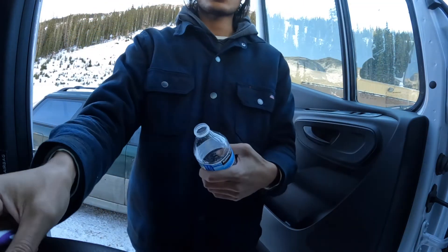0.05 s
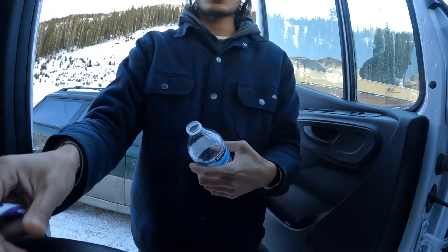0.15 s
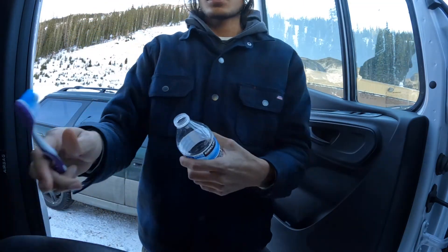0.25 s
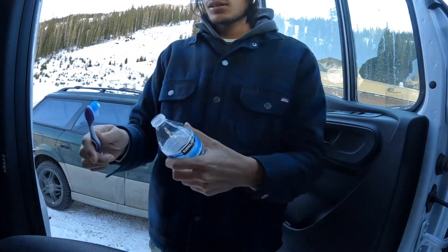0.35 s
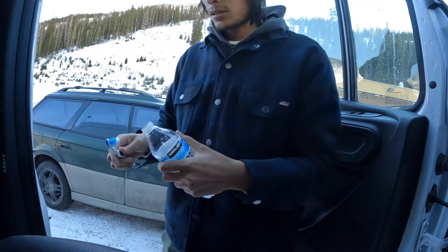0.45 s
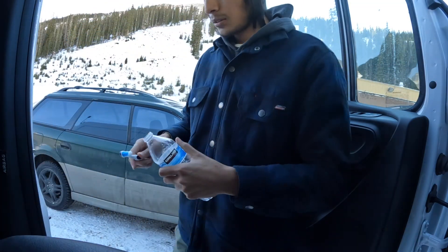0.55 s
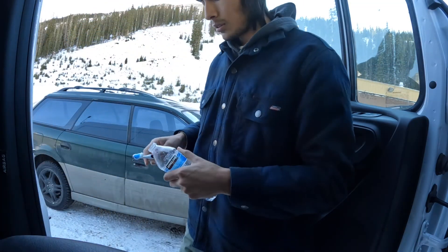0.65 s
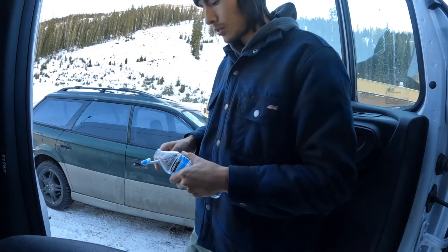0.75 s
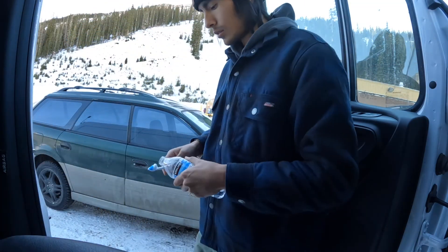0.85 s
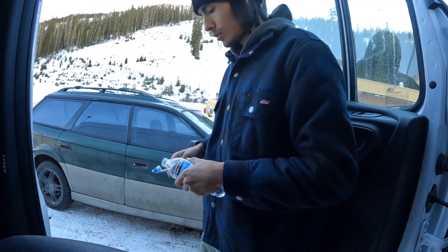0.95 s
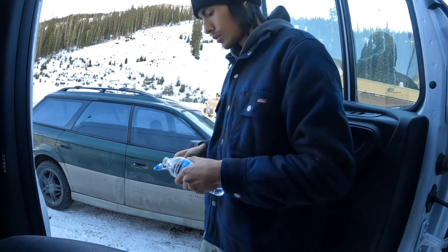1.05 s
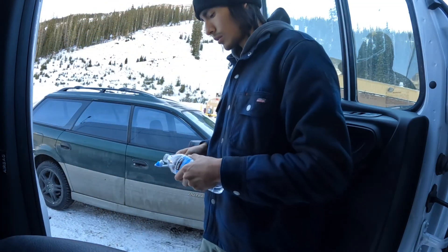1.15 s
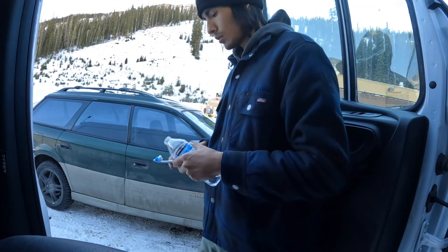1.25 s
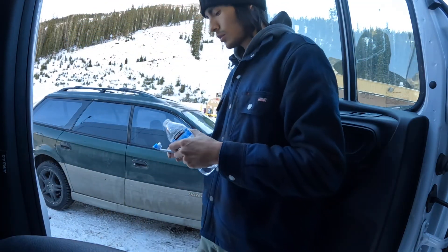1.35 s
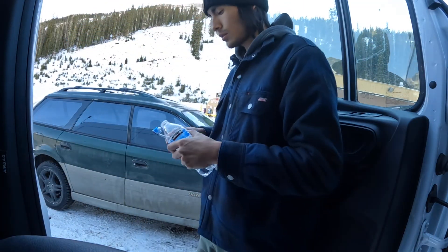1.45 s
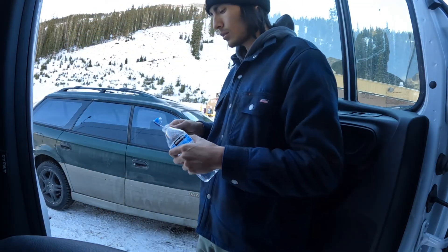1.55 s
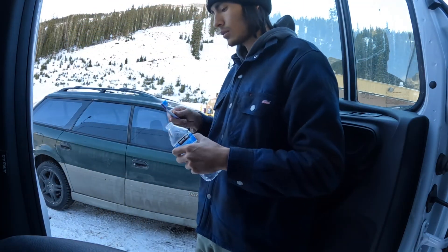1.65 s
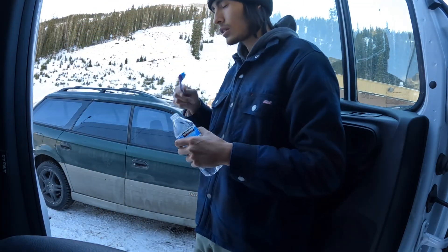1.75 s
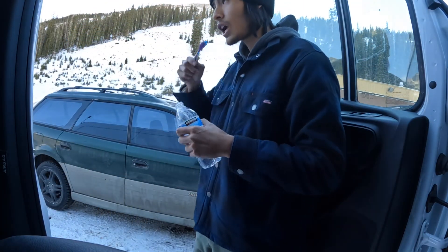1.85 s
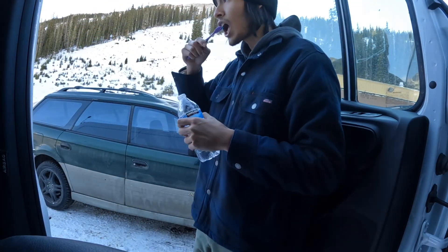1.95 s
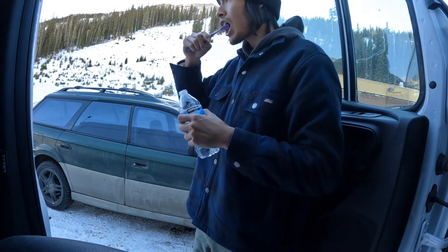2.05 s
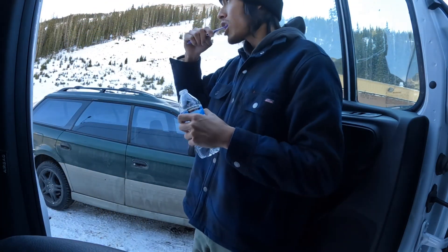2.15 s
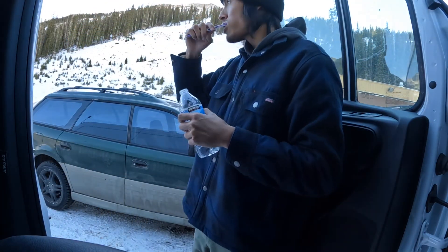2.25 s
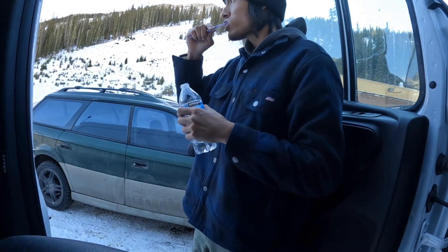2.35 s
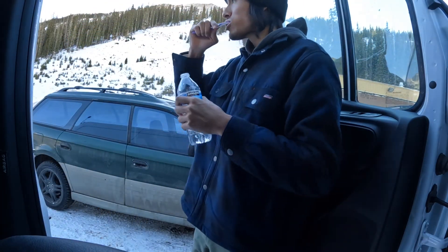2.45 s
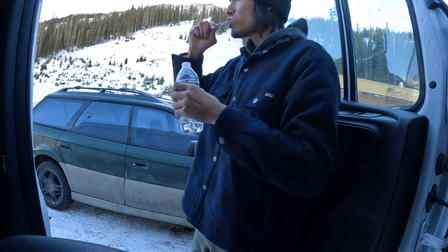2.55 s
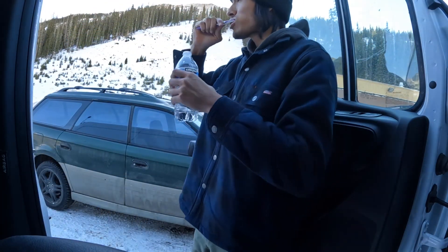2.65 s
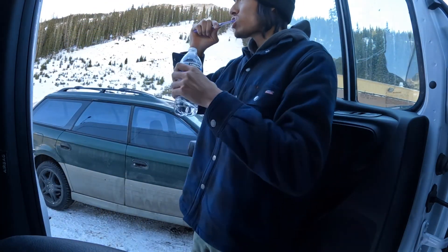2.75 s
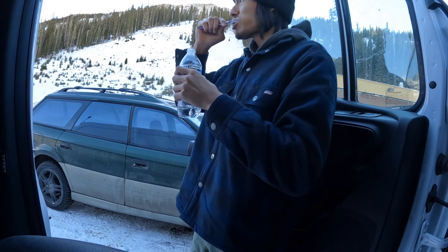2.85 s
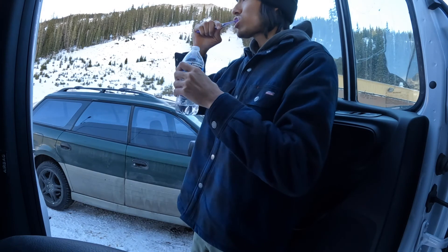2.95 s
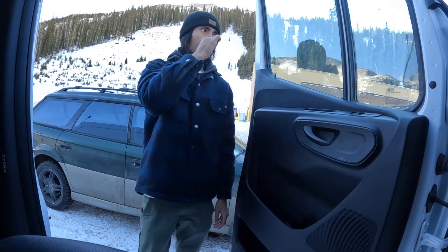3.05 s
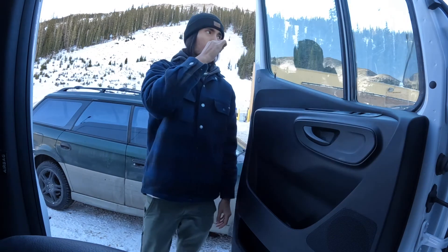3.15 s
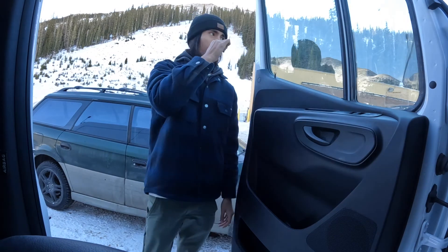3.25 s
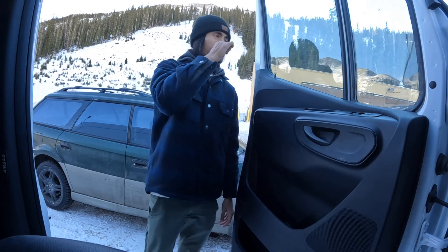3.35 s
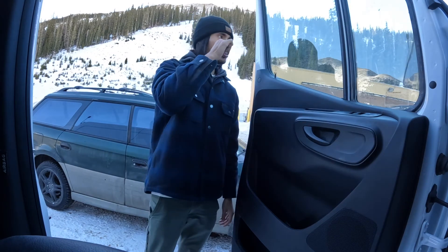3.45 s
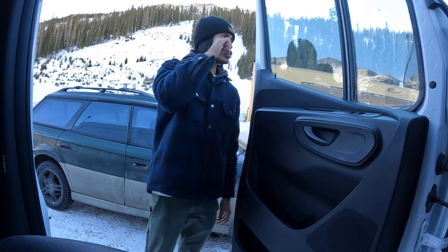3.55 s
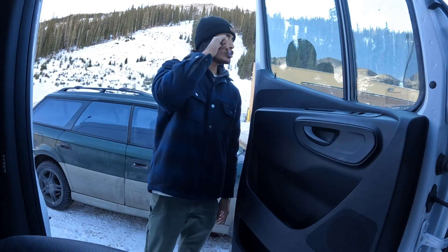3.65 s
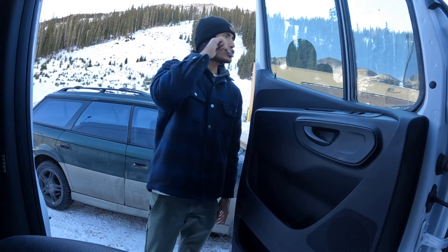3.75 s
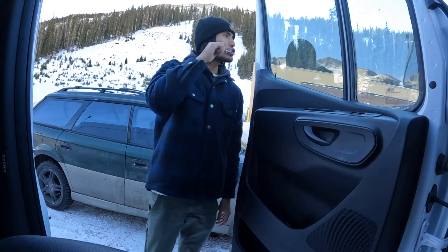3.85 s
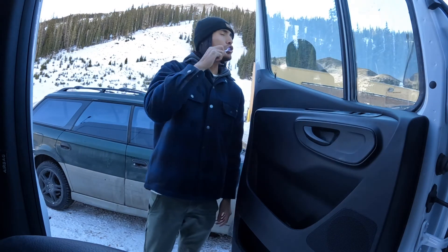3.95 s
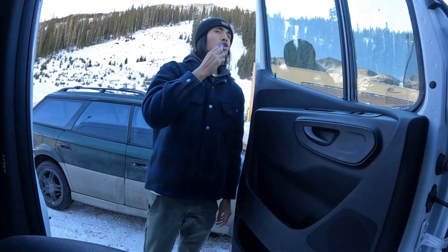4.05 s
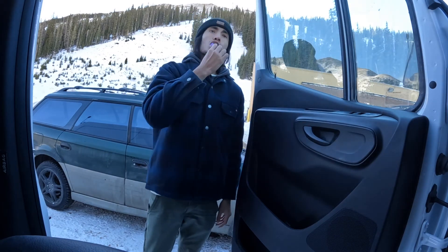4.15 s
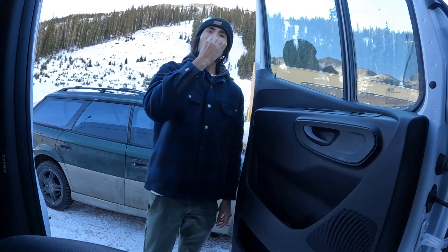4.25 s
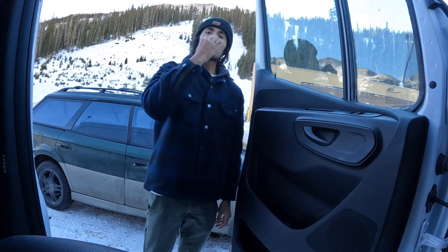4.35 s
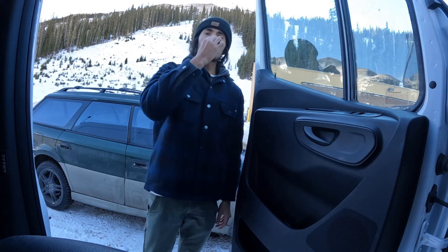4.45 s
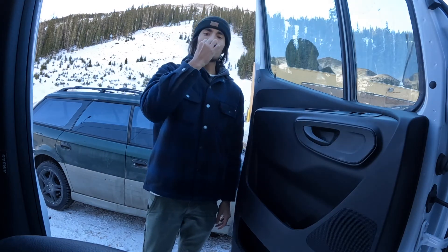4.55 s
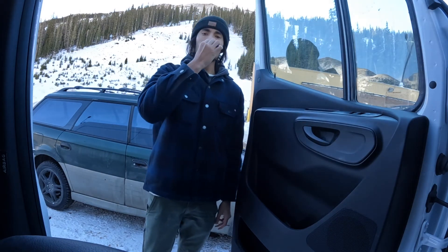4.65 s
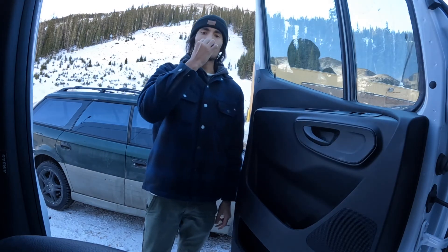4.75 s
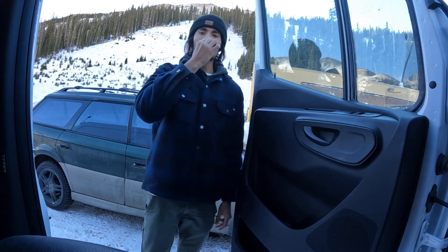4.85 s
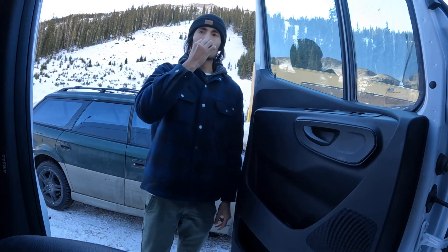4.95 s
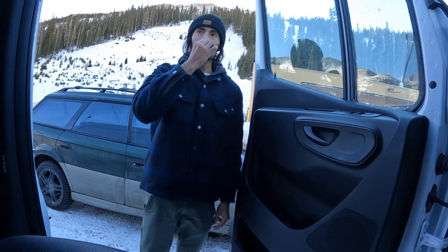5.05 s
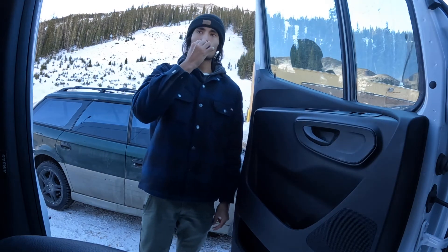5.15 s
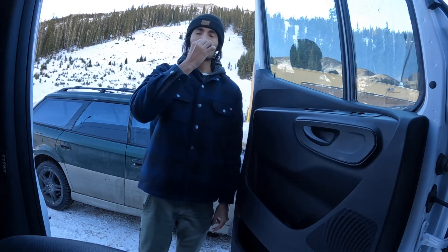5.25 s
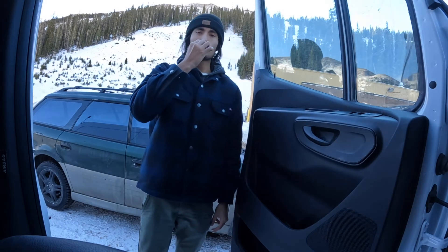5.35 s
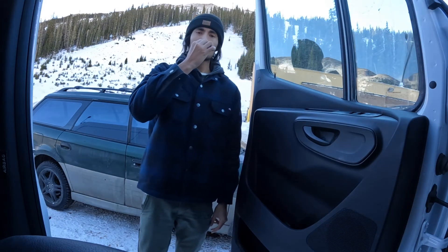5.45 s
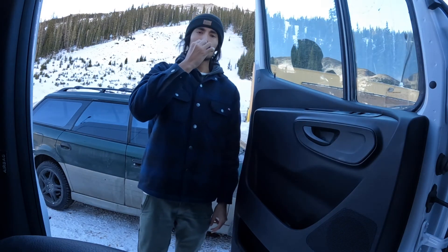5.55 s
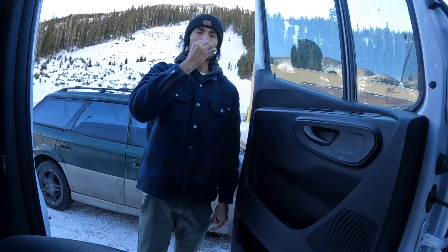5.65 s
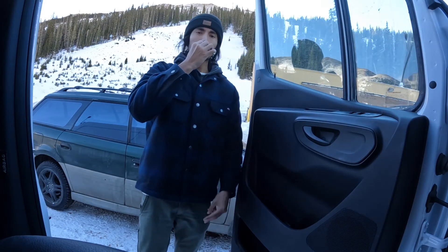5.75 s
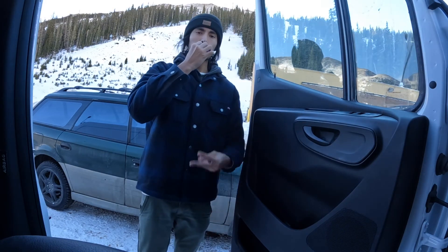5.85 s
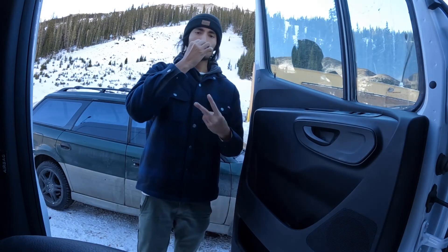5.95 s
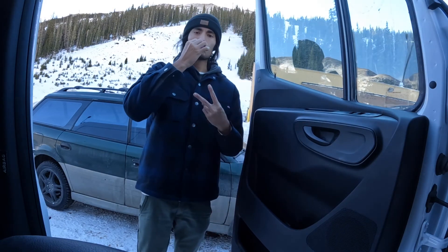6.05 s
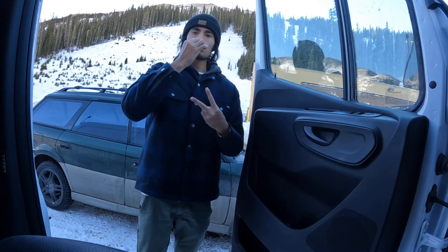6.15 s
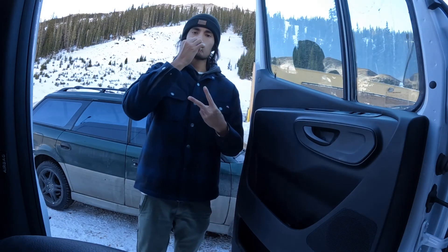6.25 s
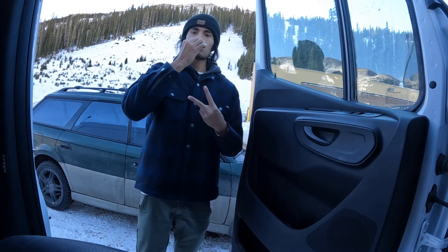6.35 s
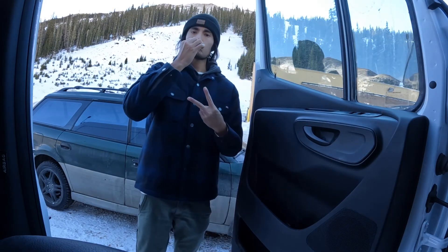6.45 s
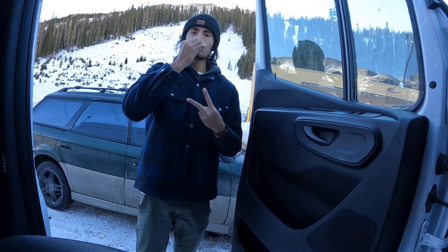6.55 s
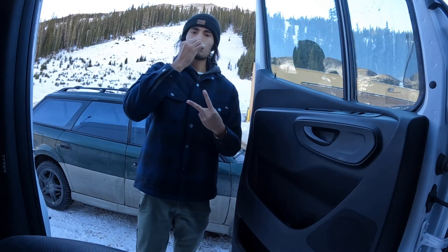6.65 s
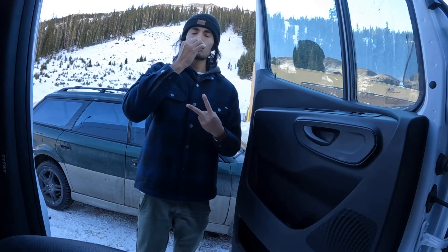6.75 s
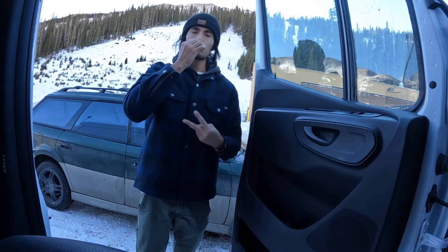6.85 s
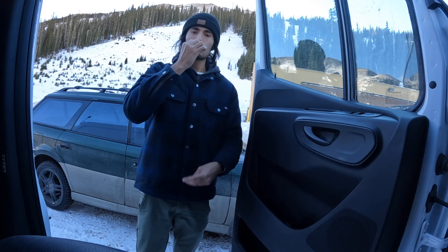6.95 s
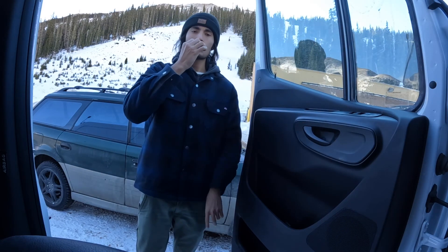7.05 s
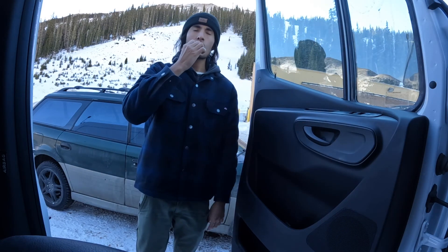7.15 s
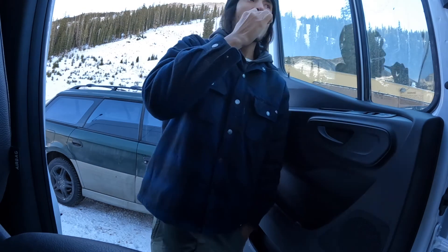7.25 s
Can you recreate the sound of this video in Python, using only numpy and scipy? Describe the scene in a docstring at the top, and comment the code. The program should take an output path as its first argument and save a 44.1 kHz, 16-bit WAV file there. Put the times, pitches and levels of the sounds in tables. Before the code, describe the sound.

Small clinks and plastic clicks, three hollow knocks on a van door with low booms, then brisk toothbrushing over a droning diesel engine.

```python
"""Small metal clinks and plastic clicks open the scene, as a man at a van's open door takes up his toothbrush.
He knocks on the hollow door three times, and the van's body booms low under the knocks and between them.
He scrubs his teeth: shaped noise makes bristle hiss and rasp, and the mouth's resonance makes foam squelch.
Behind him a diesel engine, built from sine lines, sets in and sags near the end.
Filtered noise makes the background roar and hiss; late on, tyre hiss grows and a thin whine climbs."""
import sys
import numpy as np
from scipy import signal
from scipy.fft import rfft, irfft, next_fast_len
from scipy.io import wavfile
from scipy.ndimage import uniform_filter1d, map_coordinates

SR = 44100
rng = np.random.default_rng(int(sys.argv[2]) if len(sys.argv) > 2 else 0)


def transcribe(signal):
    """Save signal, clipped to [-1, 1], as a 16-bit WAV file at the path in sys.argv[1]."""
    frames = np.atleast_2d(signal).T
    limited = np.clip(frames, -1, 1)
    pcm = np.round(limited * 32767).astype(np.int16)
    wavfile.write(sys.argv[1], SR, pcm)


N = 321930

# Levels in the tables are relative: each sound's own gains come on top.
# bouts of even to-and-fro brushing: first_push_s, last_push_s, cycle_s, hiss_db, rasp_db, foam_db
BRUSHING_BOUTS = [(3.205, 3.86, .218, -69, -70, -73), (4.047, 5.88, .2033, -69.5, -71, -59.5),
                  (6, 7.29, .213, -71.5, -72.5, -56)]
# colour of the bristle hiss: freq_hz, level_db
BRISTLE_COLOUR = [(3000, -20), (5200, -8), (6500, 0), (7300, -1.5), (9000, -8.5), (12200, -13),
                  (15000, -20)]
# colour of the rasp on the teeth: freq_hz, level_db
TEETH_COLOUR = [(1200, -4.5), (2200, 7), (3000, 3.5), (3800, -1.5), (4400, -1), (5300, -34), (8000, -40.5)]
# how openly the brush sounds between the lips: time_s, level_db
LIP_OPENING = [(2.5, -33), (2.9, -4), (3.45, -4), (4.1, -7.5), (4.65, 2.5), (5.6, -0.5), (6.03, 3),
               (6.3, 2), (6.95, 5), (7.3, 12.5)]
# resonance of the mouth cavity: time_s, pitch_hz
MOUTH_PITCH = [(3.9, 1073), (4.25, 1308), (4.7, 1261), (5.3, 1140), (5.55, 1220), (5.9, 1002), (6.45, 1031),
               (6.7, 1135), (7.3, 1271)]
# big foam bubbles that pop in the mouth: start_s, level_db
BUBBLE_POPS = [(4.244, -39), (4.656, -33), (4.868, -37.5), (5.266, -36.5), (6.229, -42), (6.433, -42.5),
               (7.28, -37)]
# small metal contacts: start_s, level_db, upper_modes_db, dry_tick_db
METAL_CONTACTS = [(0.058, -34, -24, 6.5), (0.109, -53, -14, 16), (0.1233, -27.5, -37.5, 10),
                  (0.155, -39.5, -26, 12.5), (0.465, -32, -6, -5.5), (0.4749, -15, -6.5, -6.5),
                  (0.777, -45, -5, -13), (0.832, -51, 15, 25.5), (0.838, -56, 3, 23)]
# the metal's main modes: pitch_hz, level_db, t60_s
METAL_MODES = [(2960, -12, 0.016), (5210, -7.5, 0.014), (4663, 9.5, 0.018), (5270, -21, .03)]
# the metal's upper modes: pitch_hz, level_db, t60_s
METAL_UPPER_MODES = [(7320, -1, 0.02), (8000, 3.5, 0.022)]
# the metal chatters as it slides: start_s, length_s, level_db
METAL_SLIDES = [(0.0, 0.089, -59), (.48, 0.12, -66)]
# clicks of brush and water bottle: start_s, level_db, strongest_resonance_hz, its_share_db, t60_s
PLASTIC_CLICKS = [(0.2432, -10.5, 3120, -15, 0.0052), (0.6193, -43.5, 3770, -1.5, 0.068),
                  (0.6758, -32, 2000, -1.5, 0.015), (1.0321, -43, 3330, 1, 0.033),
                  (1.2131, -54, 2020, 8, 0.05), (1.7111, -43.5, 2200, -15, 0.045),
                  (1.853, -47.5, 3380, 6, 0.035), (1.8858, -46.5, 3270, -12, 0.022),
                  (2.2468, -60, 2430, 9, 0.02), (2.2685, -51.5, 2240, -1.5, 0.025),
                  (2.4831, -45, 3670, -3, 0.013), (4.362, -44.5, 7000, -10, 0.12),
                  (6.005, -46.5, 7500, 2, 0.042), (7.222, -35, 2350, 4.5, 0.023)]
# colour of plastic clicks and dry ticks: freq_hz, level_db
PLASTIC_COLOUR = [(290, -38), (500, -2.5), (1330, -2.5), (2920, -5.5), (3270, -7.5), (3560, -3),
                  (5230, -15.5), (7360, -5.5), (8990, -23.5), (12300, -29.5), (15000, -35.5)]
# moves of the jacket: start_s, length_s, cloth_db, dull_rub_db
JACKET_MOVES = [(0.0, 0.38, -54, -45.5), (.38, 0.41, -57, -49.5), (0.628, 0.036, -38, -52),
                (0.686, 0.035, -54, -43), (0.801, 0.19, -55, -46.5), (1.015, 0.072, -54, -43),
                (1.088, 0.11, -56.5, -38), (1.872, 0.08, -58, -60), (1.954, 0.17, -62, -55.5),
                (2.117, 0.28, -76, -56.5), (2.625, .45, -64.5, -59), (3.19, 0.353, -61, -54.5)]
# colour of cloth on cloth: freq_hz, level_db
CLOTH_COLOUR = [(240, -24.5), (400, -4.5), (1100, -6.5), (1910, -20.5), (2320, -17.5), (4010, -20.5),
                (5350, -32.5), (7130, -25), (12100, -40.5), (13900, -43), (15000, -68)]
# blows on the door: start_s, panel_db, thump_db, crunch_db, rise_s
DOOR_BLOWS = [(0.711, -26, -25.5, -50, 0.0033), (0.7246, -15, -18.5, -24, 0.0011),
              (0.75, -26.5, -21, -32.5, 0.0059), (1.091, -20, -13, -24, 0.0023),
              (1.117, -25, -20.5, -34.5, 0.0046), (1.36, -24.5, -34, -35, 0.0037),
              (1.38, -26, -38, -46, 0.0026)]
# the door panel's modes: pitch_hz, level_db, t60_s
PANEL_MODES = [(390, -9, 0.13), (494, -7, 0.086), (560, -2, 0.14), (628, 7, 0.051), (715, -9, 0.037),
               (862, -9, 0.11), (949, -1, 0.057), (1130, -6, 0.096), (1237, -14, 0.072), (1420, -30, 0.08),
               (1700, -28, 0.05), (2190, -17, 0.047), (2910, -20, .06)]
# colour of the air behind the panel: freq_hz, level_db
HOLLOW_COLOUR = [(40, 9), (110, -5), (190, 3.5), (280, -0.5), (500, -13.5), (1100, -26), (3000, -65.5)]
# colour of the crunching trim: freq_hz, level_db
TRIM_COLOUR = [(400, -14), (900, 4.5), (1300, 0), (2000, -9.5), (4000, -11.5), (5200, -19), (7300, -21.5),
               (9500, -32), (12500, -37.5), (15000, -56)]
# low booms of the van's body, under the knocks and between them:
# start_s, level_db, most_excited_hz, left_minus_right_db
BODY_BOOMS = [(0.274, -20, 92, -2), (0.727, -11.5, 112, 0), (0.81, -19.5, 83, -2), (0.941, -21.5, 100, -2),
              (1.09, -3, 54.7, -0.5), (1.098, -23, 181, 0), (1.229, -16, 48, 0.5), (1.365, -19.5, 133, 1.5),
              (1.533, -16.5, 140, -8.5), (1.621, -25, 72, -5), (1.709, -23.5, 53, -6), (2.371, -22, 46, 0),
              (2.434, -19, 46, 0.5), (2.738, -27.5, 70, -0.5)]
# modes of the van's body: pitch_hz, level_db, t60_s
BODY_MODES = [(38.2, 4.5, .55), (48.5, -14, 0.39), (71.6, 3, 0.28), (99.8, 2, 0.35), (127, 4, 0.11),
              (175, -2.5, 0.21), (253.4, 8, .17), (532, -1.5, 0.13)]
# decay of the cabin's echo: freq_hz, t60_s
CABIN_DECAY = [(100, 0.22), (600, 0.076), (3000, 0.092), (12000, 0.054)]
# ear balance of a sound with leftness 1: freq_hz, left_minus_right_db
LEFT_TILT = [(120, 0), (380, 2), (690, 8), (1280, 8.5), (2400, 7.5), (4400, 3.5), (8000, 4), (14800, 21)]
# the engine over time: time_s, base_rate_hz, load_db, pipe_note_db
ENGINE_COURSE = [(3.1, 33.78, -1, -46.5), (3.68, 33.52, -2.5, -40.5), (3.93, 32.75, -2, -50.5),
                 (4.7, 32.66, 2, -47.5), (5.25, 32.47, 5, -40.5), (5.7, 32.13, 7.5, -37.5),
                 (6.06, 32.04, 4, -38), (6.28, 31.39, -2.5, -69), (6.75, 29.03, 1.5, -46.5),
                 (7.05, 28.4, 4, -47), (7.3, 29.55, -9, -55)]
# lines of the engine's drone: multiple of the base rate, level_db
DRONE_LINES = [(4.5, -15), (5, -11), (6.5, -7.5), (7, -8.5), (7.5, -13.5), (8, -3), (9, -12), (10, -16),
               (12, -24)]
# background roar and hiss over time; the early hiss is cloth rustle: time_s, roar_db, hiss_db
BACKGROUND_COURSE = [(0.0, -57, -57), (1.55, -51, -68), (2.1, -49, -64.5), (2.75, -48, -60),
                     (3.4, -45.5, -58), (4.05, -45.5, -59.5), (5.1, -44, -58.5), (6.5, -46, -56.5),
                     (7.3, -42.5, -52)]
# low rumble over time: time_s, level_db
RUMBLE_COURSE = [(0.0, -36), (.3, -33), (.5, -43), (1.15, -35), (2.1, -43), (2.9, -40), (3.3, -34),
                 (4.4, -36.5), (6.3, -35), (7.3, -31.5)]
# colour of the low rumble: freq_hz, level_db
RUMBLE_COLOUR = [(4, -8.5), (11, -0.5), (18, -1), (43, 2.5), (60, -4.5), (90, -4), (130, -15), (270, -22.5),
                 (400, -25.5), (520, -41), (880, -120)]
# colour of the background roar, shared by the jacket's dull rub: freq_hz, level_db
ROAR_COLOUR = [(76, -50), (130, -8.5), (167, -6), (199, -5.5), (231, -6), (290, -9.5), (359, -22),
               (467, -14), (523, -16.5), (919, -26), (2600, -42), (3380, -75), (5720, -120)]
# colour of the background hiss: freq_hz, level_db
HISS_COLOUR = [(710, -6.5), (1200, 1), (1290, -2.5), (1440, -2), (2010, -15), (2570, -21), (3070, -17.5),
               (3680, -19), (5210, -27.5), (7160, -18.5), (8750, -29.5), (12300, -30), (15000, -68)]
# likeness of the two ears in the background noise: freq_hz, correlation (1 = same)
EAR_LIKENESS = [(30, 0.99), (90, 1), (180, 1), (540, 0.94), (1640, 0.56), (4930, 0.33), (14800, 0.36)]
# a thin whine out of the traffic: time_s, pitch_hz, level_db
WHINE_COURSE = [(6.2, 2587, -82), (6.55, 2656, -65), (6.9, 2770, -61), (7.3, 2845, -57)]
# tone of the microphone: freq_hz, level_db
MICROPHONE_TONE = [(11000, 0), (12500, 1), (14000, -4.5), (15000, -24)]

RETURN_SHARE = 0.51  # of a cycle, from the push to the pull
PULL_HISS_DB, PULL_RASP_DB, PULL_FOAM_DB = -2, -2, -8.5  # the pull against the push
STROKE_SCATTER_S, STROKE_UNEVEN_DB = 0.005, 2  # random spread
SQUEAK_DB, SQUEAK_HZ = 1.5, 3730  # wet bristles on the pull, against its rasp
ENGINE_ON_S, ENGINE_RISE_S = 3.03, 0.079
SECOND_DB, THIRD_DB, DRONE_DB = -35, -35.5, -46.5  # at load 0
SECOND_GROWS, THIRD_GROWS, DRONE_GROWS = 1.19, 0.21, 1.32  # dB per dB of load
TUNED_HZ, BOOM_DB_PER_HZ = 34.4, 1.72  # the boom weakens as the rate sags below the exhaust's tuning
HUM_HZ = 286.2  # a hum beside the engine
TOP_HZ = 15100  # band limit


def toothbrush(stroke_s=0.025, squelch_s=0.0065, scrub_db=-72):
    """Bristles flick over teeth on each stroke, squeak on pulls and crackle between; foam rings the mouth."""
    t = np.arange(-SR // 10, SR // 10) / SR
    bristles, foam = np.zeros(N), np.zeros(N)
    swell = np.hanning(len(t)) / (1 + (t / squelch_s) ** 2)

    def snaps(spiky_db):
        return grains(len(t), spiky_db)

    for s, hiss_db, rasp_db, foam_db, pull in strokes():
        # the gap between lips and brush is new on every stroke and rings at its own pitch
        gap = np.exp(0.06 * rng.standard_normal(3))
        force = amp(STROKE_UNEVEN_DB * rng.standard_normal(3))
        width_s = stroke_s * rng.uniform(0.7, 1.25)
        stroke = np.exp(-0.5 * (t / width_s) ** 2)

        hiss = coloured(snaps(9), BRISTLE_COLOUR)
        hiss += 0.39 * narrow(snaps(-6), 7000 * gap[0], width_hz=96)
        rasp = coloured(snaps(7.5), TEETH_COLOUR)
        rasp += 0.48 * narrow(snaps(2), 3600 * gap[1], width_hz=490)
        squeak = narrow(snaps(-1), SQUEAK_HZ * np.sqrt(gap[2]), width_hz=210)
        squeak = pull * amp(SQUEAK_DB) * swell * squeak
        brushed = force[0] * amp(hiss_db) * stroke * hiss
        brushed += force[1] * amp(rasp_db) * (stroke * rasp + squeak)
        add(bristles, s + t[0], brushed)

        mouth_hz = np.interp(s, *np.transpose(MOUTH_PITCH))
        squelch = swell * narrow(snaps(13.5), mouth_hz, width_hz=205)
        add(foam, s + t[0], force[2] * amp(foam_db) * squelch)
    scrub = amp(scrub_db + 4.1 * wobble(35)) * coloured(grains(N, spiky_db=5), TEETH_COLOUR)
    return foam + amp(curves(LIP_OPENING)[0]) * (bristles + scrub)


def strokes():
    """Each cycle of the hand is a push and a pull: start_s, hiss_db, rasp_db, foam_db, is_pull."""
    for first, last, cycle_s, hiss_db, rasp_db, foam_db in BRUSHING_BOUTS:
        pull_levels = hiss_db + PULL_HISS_DB, rasp_db + PULL_RASP_DB, foam_db + PULL_FOAM_DB
        for k in range(round((last - first) / cycle_s) + 1):
            s = first + k * cycle_s + STROKE_SCATTER_S * rng.standard_normal()
            yield s, hiss_db, rasp_db, foam_db, False
            if s + cycle_s / 2 < last:
                yield s + RETURN_SHARE * cycle_s, *pull_levels, True


def bubbles(rise_s=0.0011, t60=0.057, waver=0.0504, slosh_db=-58):
    """Foam sloshes and big bubbles burst; both ring the mouth, whose pitch wavers as the brush moves."""
    pops, t = np.zeros(N), np.arange(SR // 10) / SR
    hz = curves(MOUTH_PITCH)[0] * (1 + waver * wobble(350))
    tone = np.sin(2 * np.pi * np.cumsum(hz) / SR)
    for s, db in BUBBLE_POPS:
        add(pops, s, amp(db - 60 * t / t60) * (1 - np.exp(-t / rise_s)))
    lather = np.interp(np.arange(N) / SR, [4.4, 4.9], [0, 1])
    slosh = lather * amp(slosh_db + 1.8 * wobble(18)) * wobble(160)
    return (pops + slosh) * tone * amp(1.3 * wobble(200))


def clinks(rattle_db=-20, rattle_s=0.0087, slide_rise_s=0.02, slide_fall_s=0.0069):
    """Metal modes ring briefly after each tick; narrow grains rattle out and chatter as it slides."""
    out, t = np.zeros(N), np.arange(SR // 4) / SR
    for s, db, upper_db, tick_db in METAL_CONTACTS:
        tick = coloured(rng.standard_normal(len(t)), PLASTIC_COLOUR)
        tick *= amp(tick_db - 11.5 - 60 * t / 0.013)
        clink = ring(METAL_MODES, t) + amp(upper_db) * ring(METAL_UPPER_MODES, t) + tick
        add(out, s, amp(db) * clink * (1 - np.exp(-t / 0.000077)))
    rattling = sum(amp(db + rattle_db) * gesture(s, 0, attack_s=0.002, release_s=rattle_s)
                   for s, db, *_ in METAL_CONTACTS)
    sliding = sum(amp(db) * gesture(s, length, slide_rise_s, slide_fall_s)
                  for s, length, db in METAL_SLIDES)
    chatter = narrow(grains(N, spiky_db=4.5), centre_hz=4760, width_hz=230) * amp(2 * wobble(70))
    return out + (rattling + sliding) * chatter


def clicks():
    """Plastic damps quickly, so noise with one strong resonance only snaps and rattles off."""
    out, t = np.zeros(N), np.arange(SR // 4) / SR
    for s, db, hz, share_db, t60 in PLASTIC_CLICKS:
        snap = coloured(rng.standard_normal(len(t)), PLASTIC_COLOUR)
        snap += amp(share_db) * narrow(rng.standard_normal(len(t)), hz, width_hz=320)
        decay = amp(-60 * t / t60) + amp(-27 - 60 * t / 0.077)
        add(out, s, amp(db - 4.5) * snap * decay)
    return out


def jacket(attack_s=0.016, release_s=0.011):
    """Cloth slides on cloth as he reaches and lifts the brush, and rubs dully along the door."""
    cloth_level, rub_level = np.zeros(N), np.zeros(N)
    for s, length, cloth_db, rub_db in JACKET_MOVES:
        move = gesture(s, length, attack_s, release_s)
        cloth_level += amp(cloth_db) * move
        rub_level += amp(rub_db) * move
    fibres = grains(N, spiky_db=3.5) * amp(5.3 * np.minimum(wobble(38), 1))
    cloth = cloth_level * coloured(fibres, CLOTH_COLOUR)
    return cloth + rub_level * coloured(rng.standard_normal(N), ROAR_COLOUR)


def door():
    """Each blow judders against the panel, thumps the hollow behind it and crunches the trim."""
    out, t = np.zeros(N), np.arange(SR // 2) / SR
    for s, panel_db, thump_db, crunch_db, rise_s in DOOR_BLOWS:
        judder = grains(len(t), spiky_db=0) * amp(-60 * t / 0.025)
        panel = signal.fftconvolve(ring(PANEL_MODES, t), judder)[:len(t)]
        panel = amp(panel_db + 2.5) * panel / np.abs(panel).max()
        thump = coloured(rng.standard_normal(len(t)), HOLLOW_COLOUR)
        thump *= amp(thump_db + 2.5 - 60 * t / 0.19)
        crunch = coloured(grains(len(t), spiky_db=-0.5), TRIM_COLOUR)
        crunch *= amp(crunch_db + 3 - 60 * t / 0.091)
        add(out, s, (panel + thump + crunch) * (1 - np.exp(-t / rise_s)))
    return out


def van_body(spread_octaves=0.34, rise_s=0.0032):
    """Low booms share the body's modes; each rings most the modes near its own pitch."""
    left, right, t = np.zeros(N), np.zeros(N), np.arange(SR) / SR
    modes = [(hz, amp(db - 60 * t / t60) * np.sin(2 * np.pi * hz * t)) for hz, db, t60 in BODY_MODES]
    for s, db, boom_hz, pan_db in BODY_BOOMS:
        boom = sum(mode / (1 + (np.log2(hz / boom_hz) / spread_octaves) ** 2) for hz, mode in modes)
        boom = -boom / np.abs(boom).max() * (1 - np.exp(-t / rise_s))
        add(left, s, amp(db + pan_db / 2) * boom)
        add(right, s, amp(db - pan_db / 2) * boom)
    return np.array([left, right])


def cabin(x):
    """The van's short, padded echo: decaying noise, different at each ear."""
    hz, t, z = signal.stft(rng.standard_normal((2, SR // 3)), SR, nperseg=256)
    decay = amp(-60 * t / along(CABIN_DECAY, hz)[:, None])
    tail = signal.istft(z * decay, SR, nperseg=256)[1]
    tail /= np.linalg.norm(tail[0])
    above_bass = filtered(x, lambda hz: hz ** 2 / (hz ** 2 + 350 ** 2))
    delayed = np.pad(above_bass, (SR // 300, 0))
    return signal.fftconvolve(delayed[None], tail, axes=1)[:, :N]


def placed(x, leftness, echo_db):
    """A sound with the cabin's answer, tilted between the ears by frequency."""
    def balance(hz):
        return amp(np.outer([0.5, -0.5], leftness * along(LEFT_TILT, hz)))

    return filtered(x + amp(echo_db) * cabin(x), balance)


def engine(rough_db=2, surge_db=1.5, hum_db=-49.5):
    """Low exhaust orders boom, higher ones drone with load, the sixth rings the pipe; a hum runs beside."""
    t = np.arange(N) / SR
    rate_hz, load_db, pipe_db = curves(ENGINE_COURSE)
    turns = np.cumsum(rate_hz) / SR + 0.004 * wobble(10)

    def line(k):
        tone = np.sqrt(2) * np.sin(2 * np.pi * (k * turns + rng.random()))
        return tone * amp(rough_db * wobble(12))

    boom = amp(SECOND_DB + SECOND_GROWS * load_db) * line(2)
    boom += amp(THIRD_DB + THIRD_GROWS * load_db) * line(3)
    boom *= amp(BOOM_DB_PER_HZ * np.minimum(rate_hz - TUNED_HZ, 0) + surge_db * wobble(8))
    pipe = amp(pipe_db) * line(6)
    # uneven cylinders put lines halfway between the whole multiples
    drone = sum(amp(db) * line(round(2 * k) / 2) for k, db in DRONE_LINES)
    drone *= amp(DRONE_DB + DRONE_GROWS * load_db)
    running = np.clip((t - ENGINE_ON_S) / ENGINE_RISE_S, 0, 1)

    hum = amp(hum_db + 4.5 * wobble(6.7)) * np.sin(2 * np.pi * HUM_HZ * t + wobble(8))
    hum_fade = np.interp(t, [2.2, 3.3], [0, 1]) ** 2
    return running * (boom + pipe + drone) + hum * hum_fade


def background():
    """An unsteady rumble, a roar and a hiss, each a wide band of patchy noise."""
    roar_db, hiss_db = curves(BACKGROUND_COURSE)
    rumble_db = curves(RUMBLE_COURSE)[0]
    rumble = amp(rumble_db + 2 * wobble(7)) * rush(RUMBLE_COLOUR, patchy_db=1)
    roar = amp(roar_db + 0.7 * wobble(3.5)) * rush(ROAR_COLOUR, patchy_db=0.77)
    hiss = amp(hiss_db + 0.6 * wobble(4)) * rush(HISS_COLOUR, patchy_db=0.7)
    return rumble + roar + hiss


def whine(fuzz_hz=85, drift_hz=45):
    """A fuzzy sine line, wavering in pitch, that comes and goes over the hiss."""
    hz, db = curves(WHINE_COURSE)
    wavering_hz = hz + fuzz_hz * wobble(300) + drift_hz * wobble(9)
    tone = np.sin(2 * np.pi * np.cumsum(wavering_hz) / SR)
    started = np.arange(N) / SR > WHINE_COURSE[0][0]
    return amp(db + 1.2 * wobble(18)) * tone * wobble(110) * started


def rush(spectrum, patchy_db):
    """Stereo noise with patches of random gain, its mid channel at rms 1."""
    z = signal.stft(rng.standard_normal((2, N)), nperseg=512)[2]
    field = uniform_filter1d(rng.standard_normal(z.shape[1:]), size=6, axis=0)
    field = uniform_filter1d(field, size=14, axis=1)
    pair = signal.istft(z * amp(patchy_db * unit(field)), nperseg=512)[1][:, :N]

    def mid_side(hz):
        turn = np.arccos(np.clip(along(EAR_LIKENESS, hz), -1, 1)) / 2
        return amp(along(spectrum, hz)) * np.array([np.cos(turn), np.sin(turn)])

    mid, side = filtered(pair, mid_side)
    return np.array([mid + side, mid - side]) / mid.std()


def ring(modes, t):
    """Struck modes with new strengths for each blow, at peak 1."""
    x = np.zeros(len(t))
    for hz, db, t60 in modes:
        strength = amp(db + 2 * rng.standard_normal() - 60 * t / t60) * rng.choice([-1, 1])
        x += strength * np.sin(2 * np.pi * hz * t)
    return x / np.abs(x).max()


def grains(n, spiky_db):
    """Dense tiny snaps of very unequal size, at rms 1."""
    size = np.repeat(rng.standard_normal(n // 16 + 1), 16)[:n]
    return unit(rng.standard_normal(n) * amp(spiky_db * np.clip(size, -2, 2)))


def gesture(start_s, length_s, attack_s, release_s):
    """An envelope that rises, holds and dies away."""
    t = np.arange(N) / SR - start_s
    return np.clip(t / attack_s, 0, 1) * np.exp(-np.maximum(t - length_s, 0) / release_s)


def wobble(rate):
    """A smooth random curve, rate knots a second."""
    coarse = np.arange(0, N + 16, 16)
    knots = rng.standard_normal(int(N * rate / SR) + 4)
    return np.interp(np.arange(N), coarse, map_coordinates(knots, [coarse * rate / SR]))


def resonance(hz, centre_hz, width_hz):
    """The response of a causal resonance of gain 1."""
    return 1j * hz * width_hz / (centre_hz ** 2 - hz ** 2 + 1j * hz * width_hz)


def narrow(x, centre_hz, width_hz):
    """x through a steep resonance (two in a row), at rms 1."""
    return unit(filtered(x, lambda hz: resonance(hz, centre_hz, width_hz) ** 2))


def coloured(x, spectrum):
    """x in the given spectrum, at rms 1."""
    return unit(filtered(x, lambda hz: amp(along(spectrum, hz))))


def filtered(x, response):
    """x times a response of frequency."""
    n = x.shape[-1]
    m = next_fast_len(n + 8192)
    return irfft(rfft(x, m) * response(np.fft.rfftfreq(m, 1 / SR)), m)[..., :n]


def along(points, hz):
    """Values between (freq_hz, value) points on a log frequency axis."""
    f, v = np.transpose(points)
    return np.interp(np.log(hz + 1), np.log(f + 1), v)


def curves(rows):
    """One value per sample for each column after the time."""
    s, *cols = np.transpose(rows)
    return [np.interp(np.arange(N) / SR, s, c) for c in cols]


def add(track, s, sound):
    """Mix a sound in from time s."""
    i = max(round(s * SR), 0)
    track[i:i + len(sound)] += sound[:max(N - i, 0)]


def amp(db):
    """Decibels to gain."""
    return 10 ** (np.asarray(db) / 20)


def unit(x):
    """Scale to rms 1."""
    return x / np.sqrt(np.mean(x ** 2) + 1e-20)


def scene():
    """The man stands a little to the left, the background lies all round."""
    teeth = placed(toothbrush() + bubbles(), leftness=0.57, echo_db=-0.5)
    hands = placed(clinks(), leftness=0.92, echo_db=-12.5)
    hands += placed(clicks(), leftness=0.12, echo_db=-6.5)
    hands += placed(jacket(), leftness=0.42, echo_db=-5.5)
    van = placed(door(), leftness=0.9, echo_db=-6) + van_body()
    motor = placed(engine(), leftness=0.1, echo_db=-11)
    return teeth + hands + van + motor + background() + whine()


def record(dry):
    """The microphone rounds off the biggest peaks, dulls the top and keeps nothing above its band limit."""
    rounded = dry / (1 + np.abs(dry / 0.66) ** 4) ** 0.25
    return filtered(rounded, lambda hz: amp(along(MICROPHONE_TONE, hz)) * (hz < TOP_HZ))


dry = scene()
out = record(dry)
transcribe(out)
```